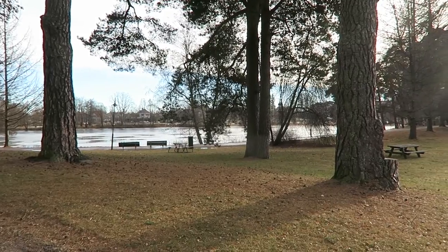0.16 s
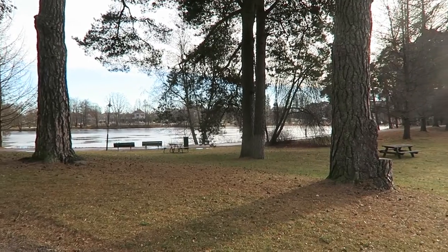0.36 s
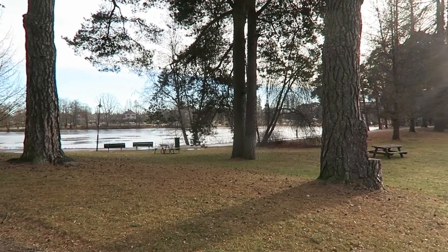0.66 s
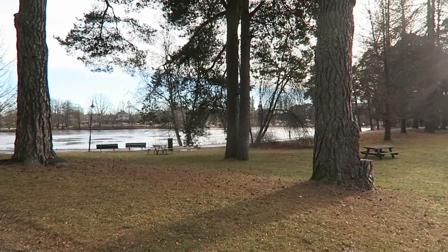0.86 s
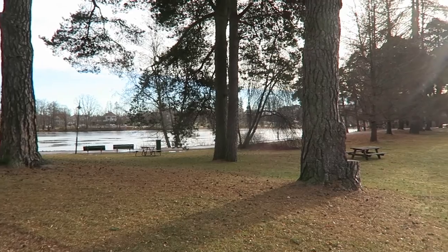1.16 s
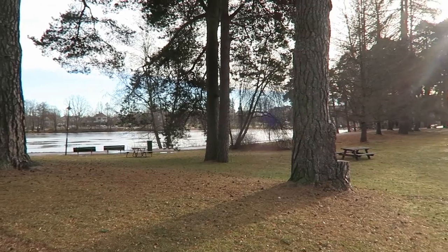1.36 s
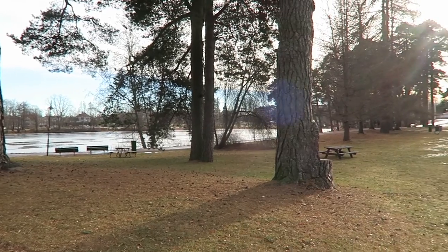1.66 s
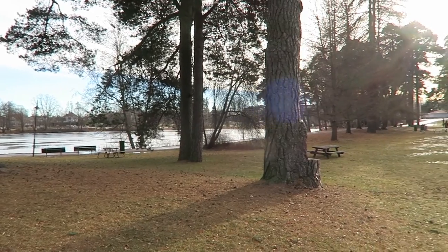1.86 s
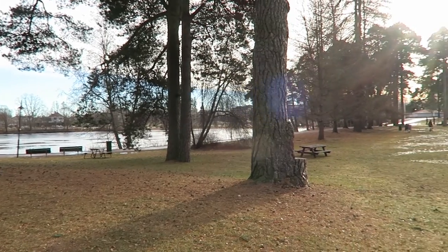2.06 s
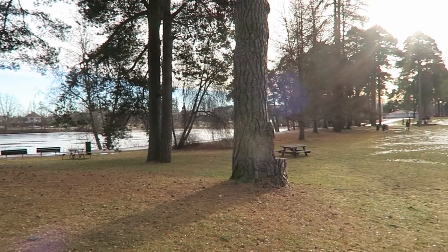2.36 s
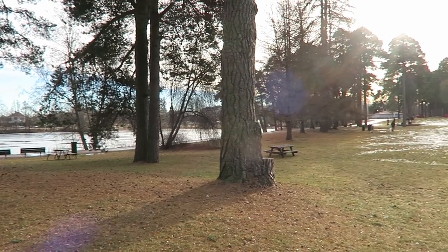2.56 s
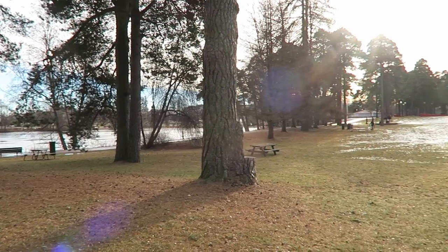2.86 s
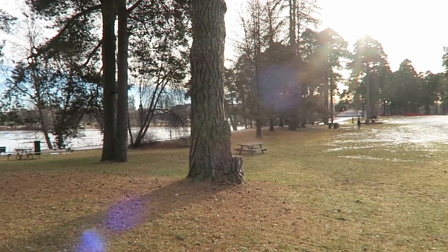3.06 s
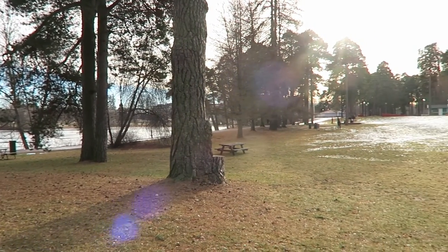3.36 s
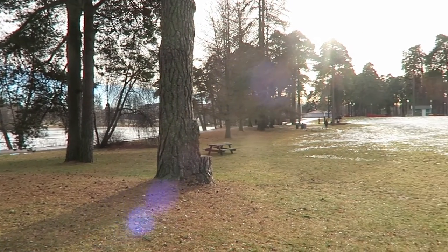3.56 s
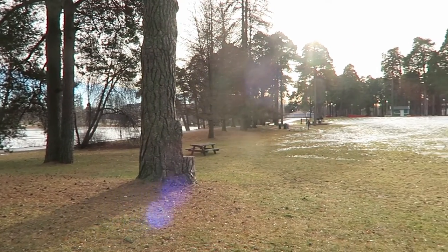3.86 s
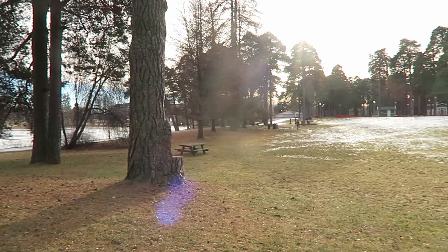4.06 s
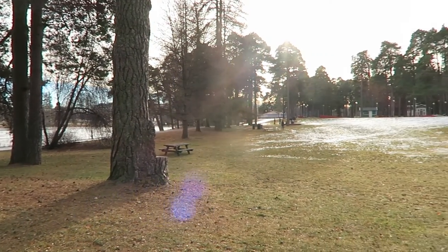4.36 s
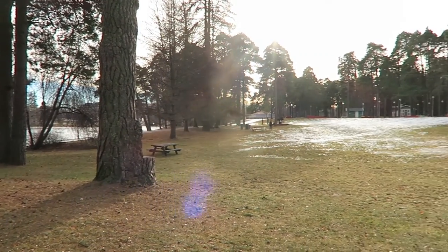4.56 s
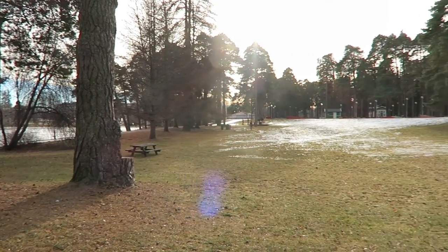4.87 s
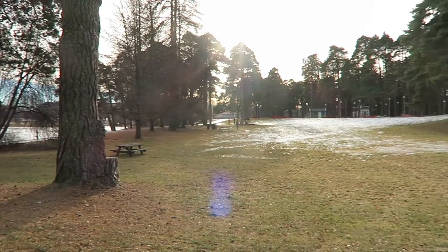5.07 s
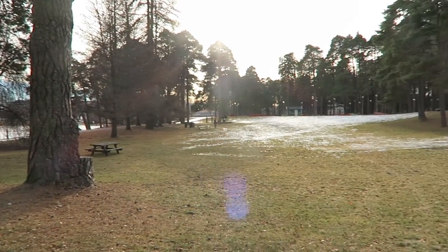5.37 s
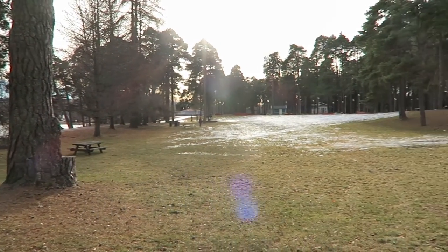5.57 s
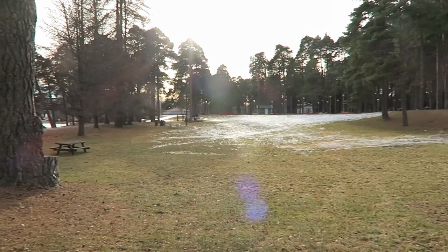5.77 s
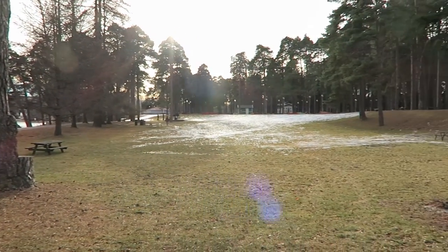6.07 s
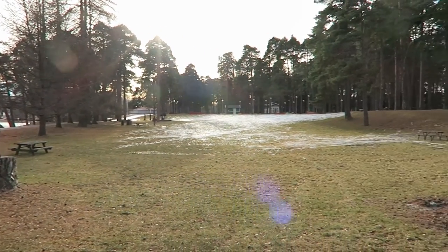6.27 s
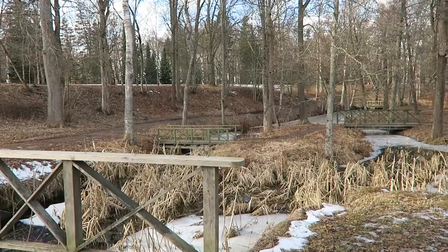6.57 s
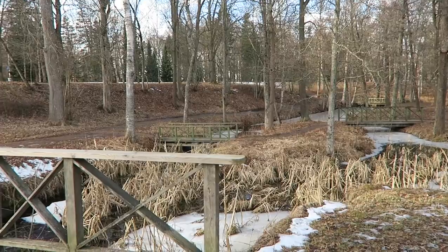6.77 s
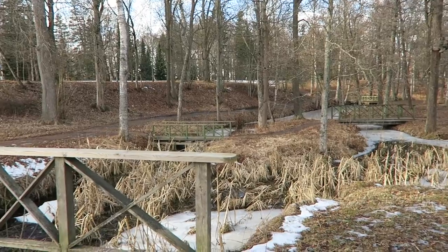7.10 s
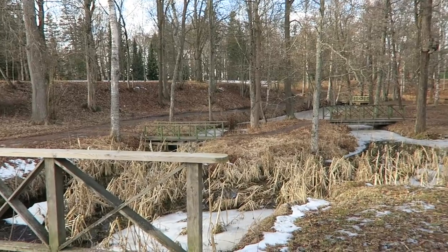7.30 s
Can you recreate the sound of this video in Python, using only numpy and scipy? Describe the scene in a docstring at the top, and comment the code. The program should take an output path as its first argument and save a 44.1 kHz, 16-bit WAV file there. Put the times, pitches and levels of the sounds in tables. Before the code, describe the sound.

Steady low traffic rumble in a lakeside park with sparse faint bird chirps and lens ticking, then an abrupt cut to a gust buffeting the microphone.

```python
"""A lakeside park in late winter: far traffic rumbles and hisses, small birds call in the pines, a lens
motor ticks faintly. Near the end the scene changes to a footbridge over a brook, where a short gust
rushes past and buffets the microphone. Traffic, brook and gust are coloured stereo noise; the drone is
a narrow noise band; birds are gliding sines; the lens is kicked resonances; buffeting is low noise read
at a varying rate."""
import sys
import numpy as np
from scipy import signal
from scipy.fft import rfft, irfft
from scipy.io import wavfile
from scipy.ndimage import uniform_filter1d

SR = 44100
rng = np.random.default_rng(int(sys.argv[2]) if len(sys.argv) > 2 else 0)


def dump_mix(stems):
    """Bounce the given channels to the path in sys.argv[1] as a 16-bit WAV at rate SR."""
    frames = np.atleast_2d(stems).T  # one column per channel
    limited = np.clip(frames, -1, 1)  # hard clip at full scale
    pcm = np.round(limited * 32767).astype(np.int16)
    wavfile.write(sys.argv[1], SR, pcm)


N = 327944
TIME = np.arange(N) / SR
FREQ = np.maximum(np.arange(N // 2 + 1) * SR / N, 1)
CUT_S = 6.632  # lawn to footbridge


def undb(db):
    """Decibels to gain."""
    return 10 ** (np.asarray(db) / 20)


def unit(x):
    """Scale to rms 1."""
    return x / np.sqrt(np.mean(x ** 2))


def curve(rows):
    """Join (s, value) points at every sample."""
    return np.interp(TIME, *np.transpose(rows))


def colour(points):
    """Gain at every frequency from (Hz, dB) points, joined over log frequency."""
    hz, db = np.transpose(points)
    return undb(np.interp(np.log(FREQ), np.log(hz), db))


def resonance(hz, width_hz):
    """Two-pole response at every frequency; half gain at the edges of width_hz."""
    return 1 / (1 + 2j * (FREQ - hz) / width_hz) ** 2


def filtered(x, response):
    """Apply a frequency response."""
    return irfft(rfft(x) * response, N)


def stereo_noise():
    """Independent white noise in two channels."""
    return rng.standard_normal((2, N))


def walk(rate_hz):
    """Random levels held 1 / rate_hz and smoothed twice; rms 1."""
    hold = max(int(SR / rate_hz), 1)
    steps = np.repeat(rng.standard_normal(N // hold + 1), hold)
    return unit(uniform_filter1d(uniform_filter1d(steps, hold), hold)[:N])


def gate(start_s, end_s, attack_s, release_s):
    """Ramp up to 1 at start_s, hold until end_s, then decay exponentially."""
    attack = np.clip((TIME - start_s) / attack_s + 1, 0, 1)
    return attack * np.exp(-np.maximum(TIME - end_s, 0) / release_s)


def stereo(mid, side):
    """Left and right from mid and side."""
    return np.array([mid + side, mid - side])


def pan(db):
    """Left and right gains for a left minus right level."""
    return undb(np.array([[db], [-db]]) / 2)


def wash(spectrum, width, leftward):
    """Countless small sources, mid at rms 1; leftward (-1 to 1) says how far they gather on one side."""
    mid, diffuse = rfft(stereo_noise()) * colour(spectrum)
    share = np.clip(leftward, -1, 1)
    # sound from one side reaches one port first: its side part is a quarter cycle ahead
    side = (1j * share * mid + np.sqrt(1 - share ** 2) * diffuse) * colour(width)
    mid = irfft(mid, N)
    return stereo(mid, irfft(side, N)) / np.std(mid)


def woods(call, lag_s, t60_s, wet_db):
    """A call from the right reaches the left port lag_s later; many trunks scatter a short tail after it."""
    delayed = filtered(call, np.exp(-2j * np.pi * FREQ * lag_s))
    direct = np.array([delayed, call])
    decay = np.exp(-np.log(1000) * TIME[:SR] / t60_s)
    scatter = rng.standard_normal((2, SR)) * decay
    scatter /= np.sqrt(np.sum(scatter ** 2, axis=1, keepdims=True))
    return direct + undb(wet_db) * signal.fftconvolve(call[None], scatter, axes=1)[:, :N]


def whistles(notes, waver_hz_s, arch, swell_db):
    """Sine glides that swell and fade; arch 1 levels pitch off at the end, swell_db favours the end."""
    out = np.zeros(N)
    wobble_hz_s = waver_hz_s * walk(700)
    for start_s, length_s, from_hz, to_hz, db in notes:
        span = slice(int(start_s * SR), int((start_s + length_s) * SR))
        u = np.linspace(0, 1, len(out[span]))
        glide = u + arch * u * (1 - u)
        # short notes waver more widely
        hz = from_hz + (to_hz - from_hz) * glide + wobble_hz_s[span] / length_s
        envelope = np.sqrt(np.pi * np.abs(np.sin(np.pi * u)))
        level = undb(db + swell_db * (u - .5))
        out[span] += envelope * level * np.sin(2 * np.pi * np.cumsum(hz) / SR)
    return out


# Spectrum of far engines. Each row: frequency in Hz, relative density in dB per Hz.
ENGINE_SPECTRUM = [(11, -16), (18, -30), (40, -3), (60, -4.5), (90, -0.5), (120, 0), (212, -5.5),
                   (400, -16), (520, -68), (880, -115)]
# Spectrum of tyre roar. Each row: frequency in Hz, relative density in dB per Hz.
TYRE_SPECTRUM = [(240, -31), (400, -4), (861, 0), (1020, -1), (1370, -10), (2700, -27), (2820, -29),
                 (4490, -37.5), (5460, -40), (7270, -44.5), (8700, -46), (9380, -48.5), (11900, -52),
                 (14500, -67)]
# Stereo width of the road. Each row: frequency in Hz, side minus mid in dB.
ROAD_WIDTH = [(25, -14), (60, -24), (90, -15.5), (130, -19.5), (200, -15), (400, -6), (700, -14),
              (1250, -12), (2300, -6.5), (4200, 1), (7800, 1), (14000, 2.5)]
ENGINES_DB, TYRES_DB = -35, -38
TYRE_LEFTWARD, TYRE_DIFFUSE_HZ = -0.5, 2300  # to the right; from all round above this pitch


def traffic(throb_db):
    """Far engines throb low down; the tyre roar above them is steady."""
    engines = wash(ENGINE_SPECTRUM, ROAD_WIDTH, leftward=.1) * undb(ENGINES_DB + throb_db * walk(6.34))
    leftward = TYRE_LEFTWARD / (1 + (FREQ / TYRE_DIFFUSE_HZ) ** 6)
    tyres = wash(TYRE_SPECTRUM, ROAD_WIDTH, leftward) * undb(TYRES_DB)
    return engines + tyres


# Engine drone swells. Each row: time in seconds, mid level in dB before DRONE_TRIM_DB.
DRONE_LEVEL = [(0, -39), (.5, -43.5), (.75, -32.5), (1.1, -39.5), (1.4, -33.5), (1.9, -39.5), (2.4, -36),
               (2.9, -42), (3.4, -33), (3.7, -41.5), (4.1, -34.5), (4.85, -41.5), (5.2, -36.5), (5.7, -36),
               (6.3, -38.5), (6.6, -35)]
DRONE_HZ, DRONE_WIDTH_HZ, DRONE_TRIM_DB, DRONE_SIDE_DB = 61.2, 35, 1.5, -21


def drone(even_s):
    """Far heavy engines: one narrow deep noise band, evened over even_s, then made to swell and sink."""
    band = resonance(DRONE_HZ, DRONE_WIDTH_HZ) / (1 + (FREQ / (2 * DRONE_HZ)) ** 6)
    boom = filtered(stereo_noise(), band)
    mid, side = boom / np.sqrt(uniform_filter1d(boom ** 2, int(even_s * SR)))
    return stereo(mid, side * undb(DRONE_SIDE_DB)) * undb(curve(DRONE_LEVEL) + DRONE_TRIM_DB)


# Spectrum of the water. Each row: frequency in Hz, relative density in dB per Hz.
BROOK_SPECTRUM = [(35, -45.5), (60, -6), (253, -5), (323, -7), (361, -5.5), (1050, -9.5), (1200, -7),
                  (1670, -14.5), (3320, -20.5), (7370, -40), (9200, -64), (12000, -59), (15600, -91),
                  (22000, -120)]
# Stereo width of the water. Each row: frequency in Hz, side minus mid in dB.
BROOK_WIDTH = [(250, -39), (800, -48), (1400, -12), (3000, -9), (5500, -2), (9000, 18)]
BROOK_FIRST_DB, BROOK_DB, BROOK_SETTLE_S = -36, -40.5, 0.42


def brook(ripple_db):
    """Running water off to the left: noise that settles to a steady level and ripples quickly."""
    db = np.interp(TIME, [CUT_S, CUT_S + BROOK_SETTLE_S], [BROOK_FIRST_DB, BROOK_DB])
    return wash(BROOK_SPECTRUM, BROOK_WIDTH, leftward=.7) * undb(db + ripple_db * walk(41))


# Running spans of the lens motor. Each row: start in seconds, end in seconds, base step level in dB.
LENS_RUNS = [(0.0045, 1.07, -62.5), (4.641, 5.2, -62), (5.208, 6.22, -61)]
# Whirr bands of the drive. Each row: centre in Hz, width in Hz, level in dB against the base step level.
WHIRR_BANDS = [(3170, 700, -12.5), (4130, 220, -13.5)]
WHIRR_FADE_S = .03


def whirr(flutter_db):
    """The running lens drive whirrs faintly and unevenly: narrow noise bands."""
    runs = [gate(start_s, end_s, WHIRR_FADE_S, WHIRR_FADE_S) * undb(db) for start_s, end_s, db in LENS_RUNS]
    running = np.max(runs, axis=0)
    bands = sum(undb(db) * unit(filtered(stereo_noise(), resonance(hz, width_hz)))
                for hz, width_hz, db in WHIRR_BANDS)
    return running * bands * undb(flutter_db * walk(20))


def impulses(rows):
    """One-sample kicks from (s, dB) rows."""
    out = np.zeros(N)
    for start_s, db in rows:
        out[int(start_s * SR) % N] += undb(db)
    return out


def scrapes(kicks, decay_s):
    """Each kick starts a short burst of noise, different at the two ports."""
    envelope = signal.lfilter([1], [1, -np.exp(-1 / (decay_s * SR))], kicks)
    return envelope * stereo_noise()


# Resonances of the lens barrel. Each row: centre in Hz, width in Hz, relative level in dB.
BARREL = [(3230, 770, -18), (4130, 290, -11), (5550, 660, -7)]
# Four steps of one motor turn. Each entry: offset in dB from the base step level.
LENS_CYCLE_DB = [1, -1.5, -2, -5]
# The motor's hardest steps. Each row: time in seconds, level in dB.
LENS_KNOCKS = [(.0712, -63), (.0902, -60), (.2054, -63), (.2712, -54), (.3386, -57), (.3576, -60),
               (.4718, -60), (.7721, -60), (.9057, -53), (4.6105, -49), (4.8595, -59), (4.9094, -64),
               (5.2436, -57), (5.2606, -53), (5.4102, -56), (5.4432, -57), (5.4605, -57), (5.5105, -56),
               (5.5834, -54), (5.744, -55), (6.1107, -60), (6.2034, -56)]
LENS_STEPS_PER_S, LENS_SCRAPE_DB = 60, -1


def lens(scrape_s, scatter_db):
    """Motor steps, uneven in groups of four, kick the barrel resonances; each also scrapes briefly."""
    steps = []
    for start_s, end_s, db in LENS_RUNS:
        for k, step_s in enumerate(np.arange(start_s, end_s, 1 / LENS_STEPS_PER_S)):
            steps.append((step_s, db + LENS_CYCLE_DB[k % len(LENS_CYCLE_DB)]))
    kicks = impulses(steps) * undb(scatter_db * walk(60)) + impulses(LENS_KNOCKS)
    body = sum(undb(db) * resonance(hz, width_hz) for hz, width_hz, db in BARREL)
    ring = irfft(body, N)
    clicks = filtered(kicks, body) / np.max(np.abs(ring))
    rub = filtered(scrapes(kicks, scrape_s), body) / np.sqrt(np.sum(ring ** 2))
    return clicks + undb(LENS_SCRAPE_DB) * rub


# Far songbird's whistles. Each row: start in seconds, starting pitch in Hz, level in dB.
FAR_SONG = [(1.0, 2620, -63), (1.052, 2655, -63), (1.125, 2660, -66), (1.16, 2655, -63), (1.225, 2640, -67),
            (1.28, 2640, -64), (1.824, 2700, -63), (1.865, 2695, -61), (1.972, 2670, -62),
            (2.07, 2700, -65), (2.17, 2690, -65), (2.235, 3345, -67), (2.78, 3630, -72), (4.15, 4300, -73)]
SONG_NOTE_S, SONG_SAG_HZ = 0.047, 20


def far_song():
    """Short, wavering whistles that each sag a little: two phrases, then stray higher notes."""
    notes = [(start_s, SONG_NOTE_S, hz, hz - SONG_SAG_HZ, db) for start_s, hz, db in FAR_SONG]
    return whistles(notes, waver_hz_s=1.3, arch=0.36, swell_db=8)


# High contact calls. Each row: start in seconds, length in seconds, first pitch in Hz, glide in Hz, level in dB.
THIN_CALLS = [(0.225, 0.023, 8900, -1140, -57.5), (1.821, 0.054, 9150, -690, -61),
              (2.375, .038, 8800, 500, -69), (3.346, 0.22, 8760, -800, -68.5), (4.15, .21, 8560, -960, -74),
              (5.114, 0.044, 9100, -800, -69), (5.238, .08, 6900, -1000, -75), (5.56, .07, 6650, -500, -75),
              (5.68, .04, 5200, -200, -69), (5.945, .05, 5150, -400, -73), (6.262, 0.07, 8900, -500, -71),
              (6.338, .085, 8320, -480, -64)]


def thin_calls():
    """Single thin high notes, most of them sliding down."""
    notes = [(start_s, length_s, hz, hz + glide_hz, db) for start_s, length_s, hz, glide_hz, db in THIN_CALLS]
    return whistles(notes, waver_hz_s=1.8, arch=0.3, swell_db=-1)


# A small bird's chips. Each row: hook start in seconds, hook length in seconds, level in dB, flicks before it.
CHIPS = [(1.172, .023, -56, 1), (1.33, .017, -57.5, 2), (2.639, .019, -59.5, 1), (2.778, .018, -58.5, 2),
         (3.257, .025, -60, 1)]
# Chips returned by the pines. Each row: delay in seconds, level in dB against the chip.
CHIP_ECHOES = [(.034, -13), (.064, -14), (.09, -16)]
CHIP_HZ, CHIP_RISE_HZ, CHIP_RASP_DB = 4420, 1180, 2.5
UPPER_VOICE_HZ, UPPER_VOICE_DB = 6700, -9
FLICK_LEAD_S, FLICK_S, FLICK_HZ, FLICK_RISE_HZ, FLICK_DB = .016, 0.012, 4860, 1400, -3.5
ECHO_S, ECHO_HZ = .05, 5480  # lingering top of a chip


def chips():
    """Upward flicks, then a two-voiced hook that rises and levels off; the top of the hook echoes."""
    notes, echoes = [], []
    for start_s, length_s, db, flicks in CHIPS:
        for k in range(1, round(flicks) + 1):
            flick_s = start_s - k * FLICK_LEAD_S
            notes.append((flick_s, FLICK_S, FLICK_HZ, FLICK_HZ + FLICK_RISE_HZ, db + FLICK_DB))
        for hz, voice_db in [(CHIP_HZ, 0), (UPPER_VOICE_HZ, UPPER_VOICE_DB)]:
            notes.append((start_s, length_s, hz, hz + CHIP_RISE_HZ, db + voice_db))
        for delay_s, echo_db in CHIP_ECHOES:
            echoes.append((start_s + delay_s, ECHO_S, ECHO_HZ, ECHO_HZ, db + echo_db))
    rasp = undb(CHIP_RASP_DB * walk(600))
    calls = whistles(notes, waver_hz_s=2.5, arch=1.2, swell_db=4) * rasp
    return calls + whistles(echoes, waver_hz_s=2.0, arch=0, swell_db=0)


# Spectrum of rushing air. Each row: frequency in Hz, relative density in dB per Hz.
RUSH_SPECTRUM = [(120, -10), (220, 3), (450, 1.5), (660, -7.5), (1080, -8), (1870, -13), (3600, -21),
                 (4400, -26), (6600, -32.5), (9190, -54), (11500, -61), (13000, -75)]
# Stereo width of rushing air. Each row: frequency in Hz, side minus mid in dB.
RUSH_WIDTH = [(200, -13), (700, -10), (2300, -8), (4200, -4), (8000, 6), (13000, 20)]
# Strength of the gust. Each row: time in seconds, level of the hiss in dB.
GUST = [(6.64, -33.5), (6.71, -31.5), (6.81, -32), (6.88, -32), (6.98, -31.5), (7.02, -36.5), (7.07, -41),
        (7.13, -64), (7.3, -90)]
# Reed crackles. Each row: peak time in seconds, peak level in dB.
SNAPS = [(6.862, -44), (6.984, -51), (7.058, -57)]
RATTLE_PER_S, RATTLE_HZ, RATTLE_WIDTH_HZ, RATTLE_DB = 600, 2870, 1600, -14  # dB against the hiss
SNAP_S, SNAP_HZ, SNAP_WIDTH_HZ = 0.006, 4000, 8500
GUST_PAN_DB = 2  # left minus right


def rush(flutter_db, rattle_swell_db):
    """The gust hisses through bare branches; dry reeds rattle in uneven swells and crackle in it."""
    hiss = wash(RUSH_SPECTRUM, RUSH_WIDTH, leftward=0.97)
    grains = (rng.random(N) < RATTLE_PER_S / SR) * rng.standard_normal(N)
    rattle = unit(filtered(grains, resonance(RATTLE_HZ, RATTLE_WIDTH_HZ)))
    rattle *= undb(RATTLE_DB + rattle_swell_db * walk(25))
    bursts = sum(undb(db) * gate(peak_s, peak_s, SNAP_S, SNAP_S) for peak_s, db in SNAPS)
    crackles = bursts * unit(filtered(stereo_noise(), resonance(SNAP_HZ, SNAP_WIDTH_HZ)))
    gust = (hiss + rattle) * undb(curve(GUST) + flutter_db * walk(40))
    return (gust + crackles) * pan(GUST_PAN_DB)


def eddies(rate_hz, rise, fall, top_ratio, steady):
    """Pressure swings carried past a port: faster air plays the same turbulence faster."""
    base_hz = 100
    f = FREQ / base_hz
    shape = f ** rise / (1 + f ** (rise + fall)) / np.sqrt(1 + (f / top_ratio) ** 10)
    field = unit(filtered(rng.standard_normal(N), shape))
    # successive eddies are of similar strength
    field /= uniform_filter1d(field ** 2, 2 * SR // base_hz) ** (steady / 2)
    position = np.cumsum(rate_hz) / base_hz % N
    return np.interp(position, np.arange(N), unit(field))


# Wind puffs. Each row: time of full strength in seconds, hold in seconds, level common to both ports in dB,
# level opposed between them in dB, eddy rate in Hz.
PUFFS = [(6.638, .018, -28, -23, 28), (6.686, .04, -27, -17, 24.2), (6.778, 0.09, -33, -37, 84.15),
         (6.899, .006, -16.5, -14.5, 75), (6.944, .012, -19.5, -16, 74.95),
         (6.978, 0.016, -14.5, -11.5, 100), (7.023, 0.029, -17, -14.5, 110),
         (7.071, 0.031, -18, -12.5, 125), (7.155, 0.0066, -24, -23, 118), (7.214, 0.034, -26, -22.5, 119.9)]
PUFF_ATTACK_S, PUFF_RELEASE_S = 0.014, 0.022
PUFF_PAN_DB = -.8  # left minus right
CALM_S, CALM_FADE_S = 7.256, 0.0096  # end and length of the final fade


def buffet():
    """Wind puffs shake two ports largely against each other: first a slow heave, then quick eddies."""
    shapes = [(gate(full_s, full_s + hold_s, PUFF_ATTACK_S, PUFF_RELEASE_S), mid_db, side_db)
              for full_s, hold_s, mid_db, side_db, _ in PUFFS]
    together = np.max([shape * undb(mid_db) for shape, mid_db, _ in shapes], axis=0)
    opposed = np.max([shape * undb(side_db) for shape, _, side_db in shapes], axis=0)
    rate_hz = curve([(full_s + hold_s / 2, hz) for full_s, hold_s, _, _, hz in PUFFS])
    # the common part never runs slower than 65 Hz
    mid = eddies(np.maximum(rate_hz, 65), rise=1.37, fall=2.7, top_ratio=5.0, steady=0.52)
    side = eddies(rate_hz, rise=3.9, fall=1.66, top_ratio=3.6, steady=.9)
    calm = np.clip((CALM_S - TIME) / CALM_FADE_S, 0, 1)
    return stereo(mid * together, side * opposed) * pan(PUFF_PAN_DB) * calm


def scene():
    """The lawn gives way to the footbridge; the lawn's sounds fade out under the gust."""
    lawn = traffic(throb_db=0.5)
    lawn += drone(even_s=0.39)
    lawn += whirr(flutter_db=2.5) + lens(scrape_s=0.0022, scatter_db=2.0)
    lawn += woods(far_song(), lag_s=.00003, t60_s=0.35, wet_db=-5.0)
    lawn += woods(thin_calls(), lag_s=.00005, t60_s=0.25, wet_db=-1.5)
    lawn += woods(chips(), lag_s=.000054, t60_s=0.5, wet_db=-6.0)
    bridge = brook(ripple_db=1.2) + rush(flutter_db=1.6, rattle_swell_db=1.5)
    fade = np.clip((7.06 - TIME) / 0.087, 0, 1)
    arrive = np.clip((TIME - CUT_S) / 0.0072 + .5, 0, 1)
    return lawn * fade + bridge * arrive + buffet()


TOP_HZ = 14400


def record(dry):
    """A steep elliptic low-pass cuts the treble above TOP_HZ."""
    low_pass = signal.ellip(8, .2, 70, TOP_HZ, fs=SR, output="sos")
    return signal.sosfilt(low_pass, dry)


dry = scene()
out = record(dry)
dump_mix(out)
```